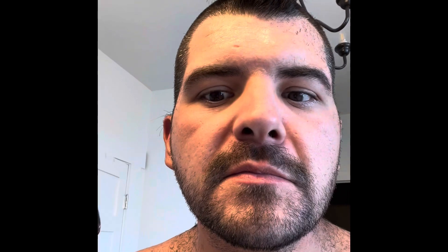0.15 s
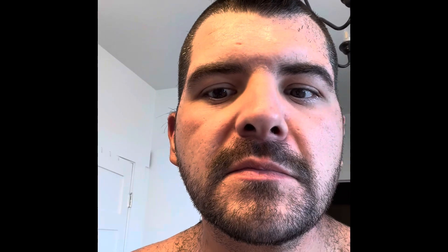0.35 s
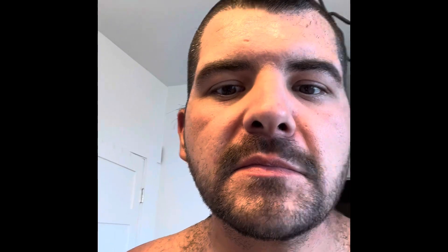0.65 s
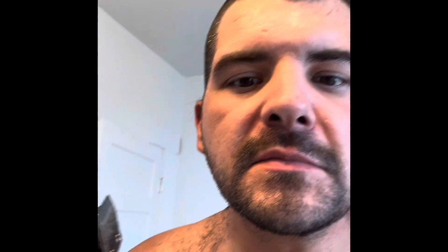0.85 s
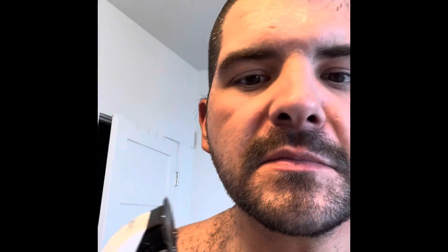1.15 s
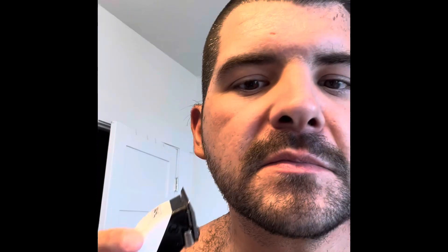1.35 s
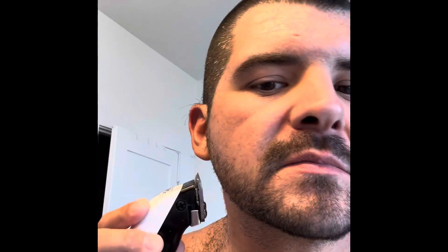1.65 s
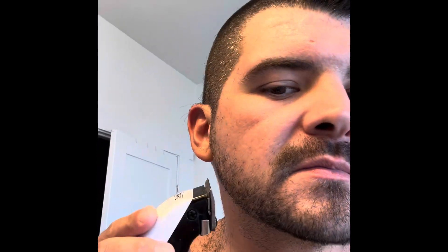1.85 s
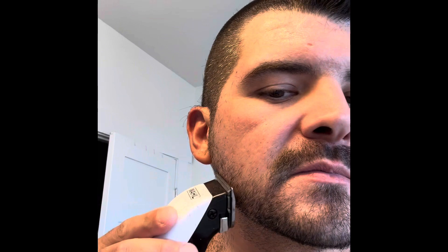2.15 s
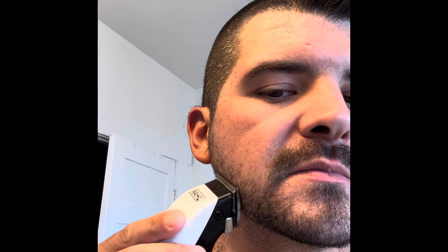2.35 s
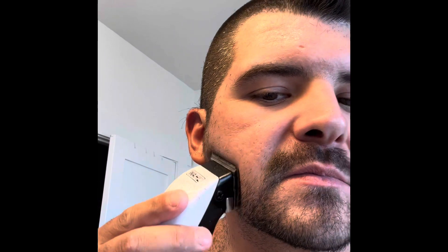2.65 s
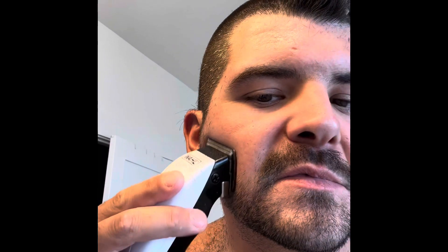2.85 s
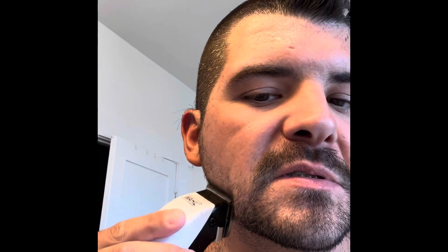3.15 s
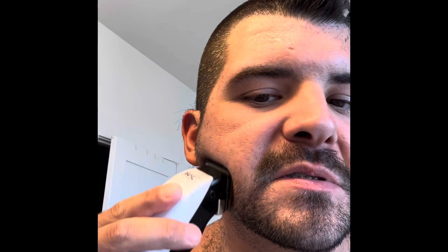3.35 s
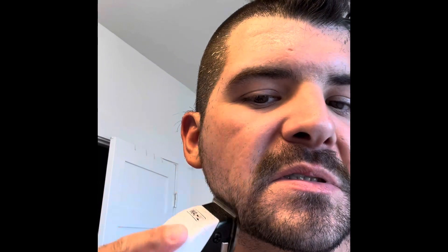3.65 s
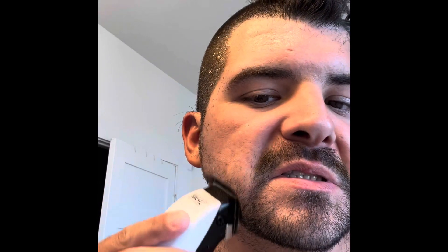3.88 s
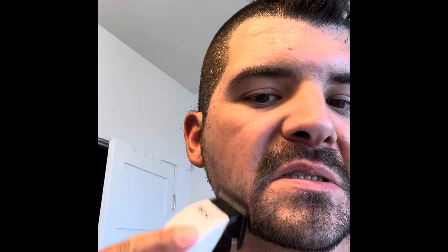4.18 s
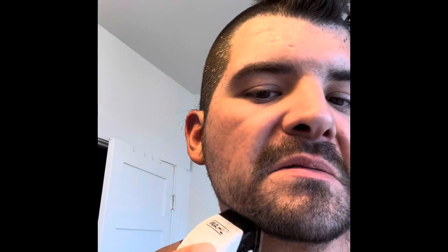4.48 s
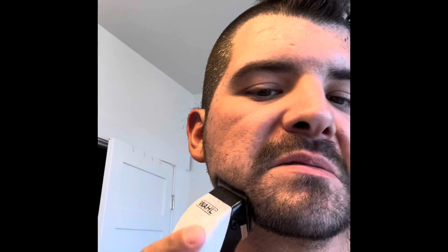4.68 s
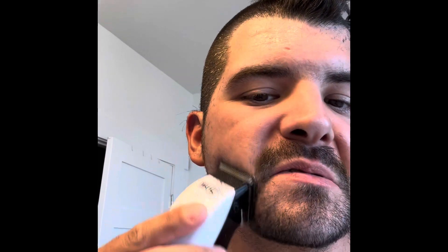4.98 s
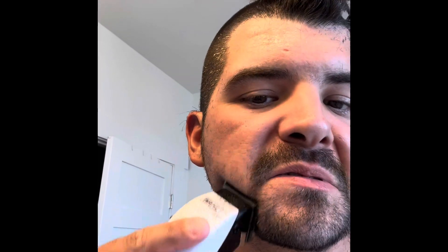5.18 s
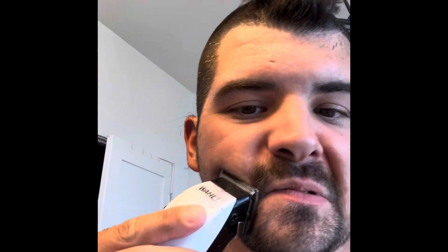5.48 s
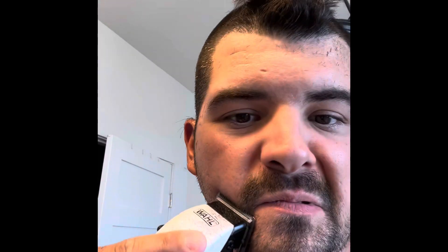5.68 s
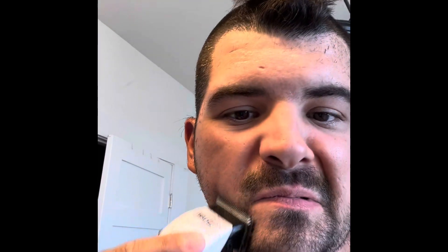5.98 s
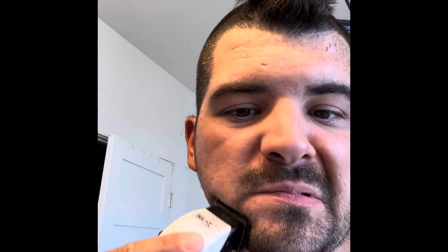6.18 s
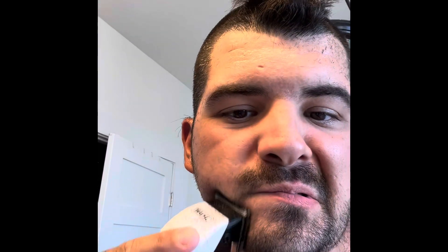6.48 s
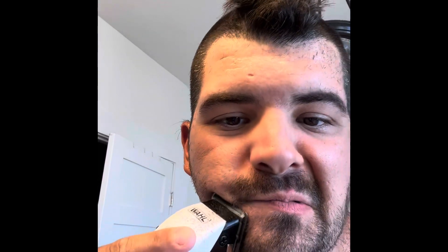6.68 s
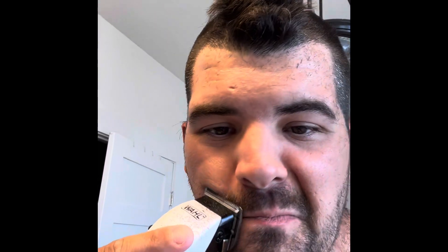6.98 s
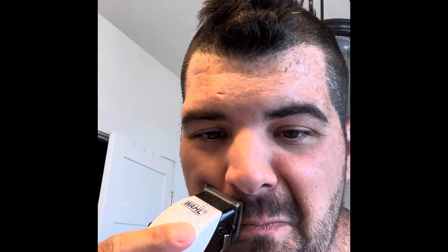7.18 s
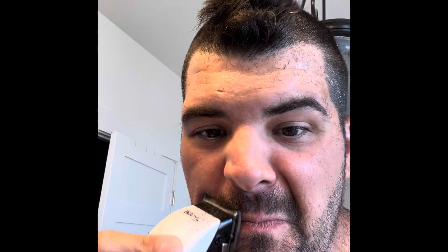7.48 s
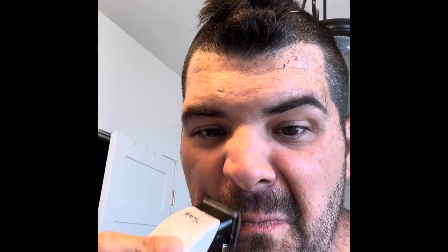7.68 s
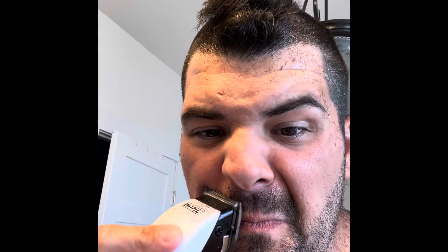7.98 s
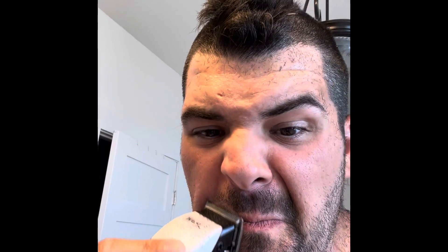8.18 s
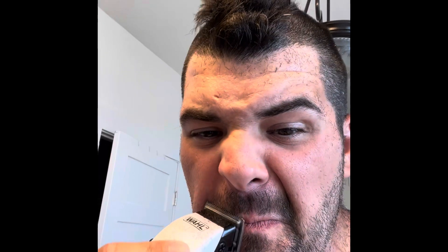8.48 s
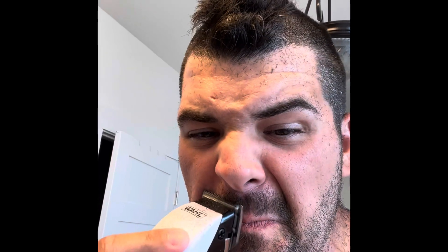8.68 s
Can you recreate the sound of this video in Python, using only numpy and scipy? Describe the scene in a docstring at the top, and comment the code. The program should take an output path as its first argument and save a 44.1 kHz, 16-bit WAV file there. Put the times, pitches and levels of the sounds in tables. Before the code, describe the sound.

A close stereo microphone in a quiet room catches hair clippers buzzing harshly at once, then abruptly quieter as the hand moves off, the tone shifting and sweeping. From about two and a half seconds the blade works on a beard: repeated brief strokes, each with a bristly rasp and a boomier buzz, with snapping hairs between. Later strokes near the lip are louder, with a sharp double bump and bright chirring of the comb.

```python
"""Hair clippers through a beard

Mains-driven clippers buzz right beside two microphone ports, swing away and are pushed through a beard in short strokes.
The armature hums near 120 Hz; the blade knocks hard one way and lightly on the way back, ringing case and steel.
Filtered noise and random plucks make the rasp of stubble, with snapping hairs, bumps and twangs of the comb.
A soft hollow rush slides down in pitch; a short room tail and still air lie behind it all."""
import sys
import numpy as np
from scipy import signal
from scipy.fft import rfft, irfft
from scipy.io import wavfile
from scipy.ndimage import uniform_filter1d, map_coordinates

SR = 44100
rng = np.random.default_rng(int(sys.argv[2]) if len(sys.argv) > 2 else 0)


def file_out(sig):
    """Save sig as 16-bit WAV at sys.argv[1]."""
    # one column per channel
    cols = np.atleast_2d(sig).T
    # limit, then scale
    lim = np.clip(cols, -1, 1)
    pcm = np.round(lim * 32767).astype(np.int16)
    wavfile.write(sys.argv[1], SR, pcm)


N = 389844
TIME = np.arange(N) / SR
BINS = np.fft.rfftfreq(N, 1 / SR)
STROKE_HZ = 120.0  # mean stroke rate
# return stroke: its place in the cycle (cycles), its strength against the outward stroke (0-1)
BACK_AT, BACK_KNOCK = .62, .45
STEEL_ABOVE_HZ = 2500  # the case knocks below this, the blade rings above


def amp(db):
    """Decibels to gain."""
    return 10 ** (np.asarray(db) / 20)


def unit(x):
    """Scales to rms 1."""
    return x / np.sqrt(np.mean(abs(x) ** 2) + 1e-20)


def follow(rows, t):
    """Every column of a curve at the times t."""
    s, *columns = np.transpose(rows)
    return [np.interp(t, s, c) for c in columns]


def across(rows, hz):
    """Every column of a spectrum at the frequencies hz, read on a log frequency scale."""
    f, *columns = np.transpose(rows)
    return [np.interp(np.log(hz + 1e-3), np.log(f), c) for c in columns]


def tint(x, colour):
    """Gives x a spectral colour, at rms 1."""
    return unit(irfft(rfft(x) * amp(across(colour, BINS)[0]), N))


def drift(shape, size):
    """Smooth chance along the last axis, rms 1."""
    x = rng.standard_normal(shape)
    for _ in range(2):
        x = uniform_filter1d(x, size, mode="wrap")
    return unit(x)


def arch(t, start, length):
    """Rises from 0 to 1 and falls back."""
    return abs(np.sin(np.pi * np.clip((t - start) / length, 0, 1)))


def add(mix, s, sound):
    """Lays a sound into the mix at time s."""
    part = mix[..., round(s * SR):][..., :sound.shape[-1]]
    part += sound[..., :part.shape[-1]]


# When one way of holding gives way to the next; 0 beside the ports, 1 in the air, 2 on the skin:
# (time [s], hold [0-2])
HOLDS = [(.37, 0), (.55, 1), (2.3, 1), (2.5, 2)]


def holding(t):
    """Crossfade shares of the three ways of holding: beside the ports, in the air, on the skin."""
    hold, = follow(HOLDS, t)
    return [np.maximum(1 - abs(hold - i), 0) for i in range(3)]


# Colour of the still air, only its shape counts: (frequency [Hz], relative density [dB per Hz])
AIR_COLOUR = [(20, -16.5), (45, -9.5), (80, 3.5), (150, -4.5), (250, -13), (600, -9), (2000, -70),
              (6000, -13), (15000, -27)]


def still_air(level_db=-61.5):
    """Steady coloured noise, one independent stream for each of two signals."""
    return amp(level_db) * tint(rng.standard_normal((2, N)), AIR_COLOUR)


def room(x, t60=0.77, low_hz=1000, high_hz=3000):
    """A tail of dense reflections, strongest in the middle range and cut off after half a second."""
    t = np.arange(SR // 2) / SR
    band = signal.butter(2, [low_hz, high_hz], "bandpass", fs=SR, output="sos")
    after_gap = t > .004
    tail = signal.sosfilt(band, rng.standard_normal(len(t)) * amp(-60 * t / t60) * after_gap)
    return signal.fftconvolve(x, tail / np.linalg.norm(tail))[:N]


# Balance of side against mid across the band; around 9 kHz the mid all but vanishes and the side carries the
# sound: (frequency [Hz], side minus mid [dB])
PORT_SPREAD = [(120, -15.5), (360, -2.5), (600, 4.5), (1000, -16), (1400, -4.5), (2000, 0), (2750, 5.5),
               (4100, -4), (5200, 1), (6300, -2.5), (7500, 3), (9200, 56), (11400, -0.5), (13500, -34.5)]


def ports(direct, scattered, likeness):
    """Spreads sound over two ports: the direct part is shared, the scattered part differs freely."""
    ratio, c = amp(across(PORT_SPREAD, BINS)[0]), np.clip(likeness, 0, 1)
    front = rfft(direct)
    side_wave = ratio * (c * port_lag(BINS) * front + np.sqrt(1 - c ** 2) * rfft(scattered))
    mid, side = irfft(np.array([front, side_wave]) / np.hypot(1, ratio), N)
    return np.array([mid + side, mid - side])


def port_lag(hz, delay_s=.00016):
    """Quarter-turn of the side against the mid, its sign set by the delay between the ports."""
    return -1j * np.sign(np.sin(2 * np.pi * hz * delay_s))


# The soft hollow rush, sliding down in pitch, before the port spread:
# (time [s], level [dB], centre [Hz])
RUSH_PATH = [(1.15, -82, 480), (1.4, -59, 430), (1.55, -49.5, 395), (1.75, -58, 365), (1.93, -50, 345),
             (2.1, -60, 305), (2.3, -62, 275), (2.5, -80, 260)]


def rush(width_hz=60):
    """Noise in one resonance that sinks: two-pole filtered complex noise shifted up to the moving centre."""
    level_db, hz = follow(RUSH_PATH, TIME)
    r = np.exp(-np.pi * width_hz / SR)
    noise = rng.standard_normal(N) + 1j * rng.standard_normal(N)
    fuzz = signal.lfilter([1], [1, -2 * r, r * r], noise)
    carrier = np.exp(2j * np.pi * np.cumsum(hz) / SR)
    return amp(level_db) * unit((fuzz * carrier).real)


# The clipper bumps the face: (time [s], peak [dB], centre [Hz], noise decay t60 [s])
FACE_BUMPS = [(4.002, -39, 230, .025), (7.5455, -17.5, 1350, .012), (7.549, -21, 1450, .014)]


def bumps():
    """Short dead knocks of the case against the face: decaying noise in a two-octave band."""
    out, t = np.zeros(N), np.arange(4096) / SR
    for s, peak_db, hz, t60 in FACE_BUMPS:
        band = signal.butter(2, [hz / 2, hz * 2], "bandpass", fs=SR, output="sos")
        knock = signal.sosfilt(band, rng.standard_normal(len(t)) * amp(-60 * t / t60))
        add(out, s, amp(peak_db) * knock / abs(knock).max())
    return out


# Pitch at which the comb rings; it ends higher as the grip shifts toward the lip:
# (time [s], frequency [Hz])
COMB_PITCH = [(2.4, 3900), (5.2, 3740), (6.4, 3760), (6.9, 4040), (8.84, 4170)]
# A tooth of the comb catches and chirrs: (time [s], peak [dB], length of the scrape [s])
TOOTH_TWANGS = [(2.359, -35, .014), (2.449, -36, .018), (3.095, -35, .025), (7.564, -24, .017),
                (8.293, -23, .009), (8.452, -32, .035), (8.601, -29, .01)]


def twangs(width_hz=520):
    """A caught tooth scrapes briefly: arched noise in a narrow band at the comb's pitch."""
    out, t = np.zeros(N), np.arange(4096) / SR
    for s, peak_db, length in TOOTH_TWANGS:
        edges = follow(COMB_PITCH, s)[0] + np.array([-.5, .5]) * width_hz
        band = signal.butter(2, edges, "bandpass", fs=SR, output="sos")
        chirr = signal.sosfilt(band, rng.standard_normal(len(t)) * arch(t, 0, length))
        add(out, s, amp(peak_db) * chirr / abs(chirr).max())
    return out


def comb_ring(x, width_hz=260, ring_db=1.0):
    """The toothed comb rings in a narrow bright band while it is on the skin."""
    turn = np.exp(2j * np.pi * np.cumsum(follow(COMB_PITCH, TIME)[0]) / SR)
    r = np.exp(-np.pi * width_hz / SR)
    # shift the comb's pitch down to zero, low-pass, shift back up
    ring = (turn * signal.lfilter([1 - r], [1, -r], x / turn)).real
    return amp(ring_db) * holding(TIME)[2] * ring


# The thickest hairs snapping: (time [s], peak [dB])
HAIR_SNAPS = [(3.256, -33), (3.461, -35), (4.995, -29), (5.061, -32), (5.408, -24), (5.461, -29),
              (6.127, -26.5), (6.244, -28), (6.547, -25), (6.557, -23), (6.709, -28), (6.966, -44),
              (6.975, -32), (7.158, -40), (7.204, -31), (8.636, -34), (8.795, -28), (8.804, -28)]
# Modes of the blade, struck by a snap or plucked by bristles:
# (frequency [Hz], relative level [dB], decay t60 [s])
BLADE_MODES = [(2283, -3.5, 0.029), (2774, -4.5, 0.063), (3790, 2, 0.014), (4092, 1, 0.032),
               (4464, -2, 0.039), (5870, -3.5, 0.022), (9360, -21, 0.006), (13050, -6.5, 0.005)]


def snaps(tick=0.53, tick_s=0.00098, tick_hz=4500):
    """A thick hair gives way with a bright noise tick and rings the blade's decaying modes."""
    out, t = np.zeros(N), np.arange(2048) / SR
    bright = signal.butter(2, tick_hz, "highpass", fs=SR, output="sos")
    for s, peak_db in HAIR_SNAPS:
        ring = np.zeros(len(t))
        for hz, db, t60 in BLADE_MODES:
            strike = rng.uniform(0.52, 1)
            ring += strike * amp(db - 60 * t / t60) * np.sin(2 * np.pi * hz * t)
        ring += tick * signal.sosfilt(bright, rng.standard_normal(len(t)) * np.exp(-t / tick_s))
        add(out, s, amp(peak_db) * ring / abs(ring).max())
    return out


def armature(sway=0.0025, jitter=.0009):
    """Strokes counted since the start: mains rate, swaying with the hand, each knock a hair early or late."""
    t = np.arange(1100) / STROKE_HZ
    slip = sway * drift(len(t), size=40) + jitter * rng.standard_normal(len(t))  # in cycles
    return STROKE_HZ * TIME + np.interp(TIME, t, slip)


# Hum of the armature before its trim, growing later as the clipper works nearer; on the skin
# the buzz follows it too: (time [s], level [dB])
HUM_LEVEL = [(0, -33), (0.45, -41.5), (1.5, -38), (3.05, -40.5), (5.2, -37.5), (7.7, -33), (8.84, -33)]
# Partials of the hum: (multiple of the stroke rate, relative level [dB], extra beside the ports [dB])
HUM_PARTIALS = [(1, 0, 0), (2, -21, 2), (3, -17, 9)]
# A tone just above the hum that makes it waver: (time [s], level [dB])
WAVER_LEVEL = [(0, -67), (4.3, -67.5), (4.44, -53), (4.62, -65), (8.5, -63), (8.7, -42), (8.84, -69)]


def hum(turns, trim_db=-2.5, waver_hz=144.7, waver_depth=1.0, air_pan_db=2.3, air_lead_rad=0.9):
    """The swinging armature shakes the body: low sines, louder and earlier at the left port in the air."""
    near, in_air, _ = holding(TIME)
    toward = np.array([[.5], [-.5]]) * in_air
    tone = np.zeros((2, N))
    for k, db, near_db in HUM_PARTIALS:
        phase = 2 * np.pi * (k * turns + rng.random()) + toward * air_lead_rad
        tone += amp(db + near * near_db) * np.sin(phase)
    waver_phase = 2 * np.pi * (waver_hz * TIME + waver_depth * drift(N, size=6000))
    waver = amp(follow(WAVER_LEVEL, TIME)[0]) * np.sin(waver_phase)
    level = amp(follow(HUM_LEVEL, TIME)[0] + trim_db + toward * air_pan_db)
    return np.sqrt(2) * (level * tone + waver)


# The clipper swings from beside the ports round to the cheek; base levels before make-up and trim:
# (time [s], buzz [dB], rasp of the free teeth [dB])
SWING_LEVELS = [(0, -17, -32.5), (0.22, -20, -35), (0.335, -21, -32.5), (.37, -31, -29.5),
                (0.41, -41.5, -40.5), (0.62, -47, -52.5), (1.05, -42.2, -55), (1.35, -41, -49),
                (1.53, -44.5, -49), (1.65, -46.5, -57), (2.25, -46.5, -59.5)]
# Rasp of the teeth gliding over the skin between pushes, growing as they come nearer:
# (time [s], level [dB])
GLIDE_LEVEL = [(2.9, -58.5), (3.6, -51.5), (5.2, -48), (8.84, -44.5)]
# Pushes through the beard, laid over the glide: (start [s], length [s], added gain at the middle [dB])
BEARD_PUSHES = [(2.303, 0.53, -48), (3.051, 0.13, -49), (3.184, 0.27, -47), (3.602, 0.14, -52.5),
                (3.792, 0.26, -43.5), (4.19, 0.29, -47), (4.493, 0.26, -44), (4.659, 0.33, -45.5),
                (4.935, 0.26, -54), (5.24, 0.37, -48.5), (5.746, 0.21, -38), (6.235, 0.24, -44.5),
                (6.45, 0.44, -51), (6.88, 0.23, -39.5), (7.115, 0.13, -41.5), (7.265, 0.089, -49),
                (7.46, 0.2, -36), (7.854, 0.18, -41.5), (8.233, 0.16, -38.5), (8.56, 0.22, -40.5)]


def cutting_gain(free_trim_db=-0.5, push_shape=0.95):
    """Strength of the rasp: free teeth in the air; on the skin a glide plus one arch for each push."""
    on_skin = holding(TIME)[2]
    free = amp(follow(SWING_LEVELS, TIME)[1] + free_trim_db)
    glide = amp(follow(GLIDE_LEVEL, TIME)[0])
    gain = (1 - on_skin) * free + on_skin * glide
    for start, length, db in BEARD_PUSHES:
        push = arch(np.arange(0, length, 1 / SR), 0, length) ** push_shape  # higher = slower entry and exit
        add(gain, start, amp(db) * push)
    return gain


# When the outward stroke lands, one row each for beside the ports, in the air, on the skin:
# (knock of the case [cycles], ring of the blade [cycles])
STROKE_LANDS = [(.43, .62), (.77, .69), (.84, .67)]


def landing(k, t):
    """Phase of the partials k at the times t: low knock and bright ring land at different points."""
    at = np.where(k[:, None] * STROKE_HZ < STEEL_ABOVE_HZ, *np.transpose(STROKE_LANDS))
    return np.exp(-2j * np.pi * k[:, None] * at) @ np.sqrt(holding(t))


def bite(turns, length=.15, between=.36):
    """The teeth close twice a stroke, hard out and lightly back, over steady rubbing; length in cycles."""
    def close(at):
        phase = turns - STROKE_LANDS[-1][-1] - at
        return np.exp(-(np.sin(np.pi * phase) / (np.pi * length)) ** 2)
    return between + close(0) + BACK_KNOCK * close(BACK_AT)


def pings(turns, per_s=170, spread_db=3.5, level_db=-7.0):
    """Single bristles pluck the modes of the blade while it is on the skin, mostly as the teeth bite."""
    t, out = np.arange(2048) / SR, np.zeros(N)
    chance = unit(bite(turns)) * per_s / SR  # per mode and sample
    for hz, db, t60 in BLADE_MODES:
        sizes = amp(spread_db * np.minimum(rng.exponential(1, N), 3))
        plucks = (rng.random(N) < chance) * sizes
        mode = amp(db - 60 * t / t60) * np.sin(2 * np.pi * hz * t)
        out += signal.oaconvolve(plucks, mode)[:N]
    return amp(level_db) * cutting_gain() * holding(TIME)[2] * unit(out)


# Colour of the rasp before the comb rings, only its shape counts:
# (frequency [Hz], relative density [dB per Hz])
RASP_TINT = [(100, -19), (300, -16), (540, -1), (780, -11.5), (1140, -9.5), (1620, -5), (2600, -1.5),
             (3420, -1.5), (4020, -4), (4980, -9.5), (6660, -10), (9660, -14), (11800, -27.5), (15600, -21)]


def rasp(turns, hairs_per_s=1500, hair_spread_db=2.4, crackle=1.1, tuft_db=1.8):
    """The teeth rub and shear hairs: noise and random clicks pulsed by the bite, each tuft coloured anew."""
    sizes = amp(hair_spread_db * np.minimum(rng.exponential(1, N), 4.5)) * rng.choice([-1, 1], N)
    hairs = unit(sizes * (rng.random(N) < hairs_per_s / SR))
    rubbing = rng.standard_normal(N)
    z = signal.stft(bite(turns) * (rubbing + crackle * hairs), nperseg=256)[2]
    tufts = unit(uniform_filter1d(drift(z.shape, size=12), size=4, axis=0))
    teeth = signal.istft(z * amp(tuft_db * tufts), nperseg=256)[1][:N]
    teeth = tint(teeth, RASP_TINT)
    return cutting_gain() * unit(teeth + comb_ring(teeth))


# The shoulder throws the buzz back as the clipper swings past:
# (time [s], echo delay [ms], echo strength [0-1])
SHOULDER_ECHO = [(.3, 0.36, 0.02), (.45, 0.7, 1), (.7, 0.77, 0.06), (1.05, 0.81, 0.34), (1.3, 0.46, 0.2),
                 (1.5, 0.65, 0.14), (1.7, 0.52, 0.36), (2.2, 0.82, 0.17), (2.5, 0.82, 0.31)]


def shoulder(hz, t):
    """One echo of moving delay combs the buzz, so its bands sweep up and down."""
    delay_ms, strength = follow(SHOULDER_ECHO, t)
    lag = np.exp(-2j * np.pi * np.outer(hz, delay_ms) / 1000)
    return (1 + strength * lag) / np.hypot(1, strength)


# Make-up of the buzz, one row each for beside the ports, in the air, on the skin; relative to the
# swing's buzz or, on the skin, the hum: (boom of the case [dB], knock [dB], ring of the blade [dB])
BUZZ_BALANCES = [(-13, -14.5, -16), (-14.5, -17, -15.5), (-16.5, -17, -16)]
# Hair loads the blade, so the case booms more and the steel rings less:
# (boom [dB], knock [dB], ring [dB])
HAIR_LOAD = (2.5, -0.5, -4)
# The case is pressed harder (+) or more lightly (-) against the jaw:
# (start [s], length [s], more boom [dB], more knock [dB])
JAW_PRESSES = [(2.702, 1.0, -3.5, 0), (4.257, 0.47, 5.5, -1), (7.16, 0.32, 9.5, 0.5), (8.185, 0.93, 3, 0)]


def buzz_bands(t):
    """Boom, knock and ring in dB: they follow nearness, the load of hair and the pressure on the jaw."""
    shares = holding(t)
    level_db = (1 - shares[2]) * follow(SWING_LEVELS, t)[0] + shares[2] * follow(HUM_LEVEL, t)[0]
    load = np.minimum(sum(arch(t, start, length) for start, length, _ in BEARD_PUSHES), 1)
    bands = level_db + np.transpose(BUZZ_BALANCES) @ shares + np.outer(HAIR_LOAD, load)
    for start, length, *more_db in JAW_PRESSES:
        bands[:2] += np.outer(more_db, arch(t, start, length))
    return bands


# Tone of the case, one row per multiple of the stroke rate from the fourth up, relative levels:
# (beside the ports [dB], in the air [dB], on the skin [dB],
#  side minus mid beside the ports [dB], side minus mid further off [dB])
CASE_TONE = [(-5.5, 4, 0.5, 1, -1.5), (1, 3, -0.5, 4.5, -26), (-3, 4.5, -5.5, 10.5, -5.5),
             (-2.5, 0, -0.5, 4, -9.5), (-3.4, -1.5, 1.4, -6, -12.5), (0.5, 3.5, 2, -17, -28),
             (-3, 3, -6.5, -9, -11), (1, -0.5, -9.5, -18, -11.5), (-1, 1.5, -5.5, -7, -1),
             (-3.5, -7, -2.5, -12, -4.5), (2, -1, -0.5, -6, -4), (-8, -3.5, -12, -9, -5.5),
             (-2, -9, -17, -24, 1), (-1, -3, -7, 3, 5.5), (-4.5, 2.5, -2, -5, -1.5),
             (-5.5, -6, -5.5, -2, 5), (1, 2, -15.5, -12, 0.5), (-0.5, 0.5, -2.5, 4, 7),
             (4.5, 5, -8, 3.5, 4), (-5, 1.5, -3, -2, 8), (5.5, 7, -8, 13.5, 4.5), (-8.5, -2, -36, -3, 5),
             (4.5, -3.5, -6, 8, 14), (-9, -3, -8, 5, -0.5), (-5, -4, -27, -2, 5),
             (-10, -2.5, -9.5, -18, -3), (-1, -2.5, -12, -10, -6.5), (0.5, -0.5, -10, -2.5, 0.5),
             (-7, -2, -8, -6, -5), (-1.5, -0.5, -19, -18, 0)]
# The same tone further up, where the steel blade rings, relative levels:
# (frequency [Hz], beside the ports [dB], in the air [dB], on the skin [dB])
STEEL_TONE = [(3960, -9, -9, -9.5), (4340, -3.5, -8, -21), (4440, -3.5, -6, -10.5), (4560, -21, -15, -32.5),
              (4680, -3, -11.5, -13), (4900, -18, -20, -19), (5170, -0.5, -11, -20), (5750, -15, -23, -14),
              (5350, -4, 1.5, -21.5), (5550, -13, -8, -13), (6270, -0.5, -12, -23.5),
              (6720, -11.5, -16.5, -15.5), (6900, -6, -17, -12), (7070, -11, -14, -26),
              (7150, -17.5, -27, -26), (7880, -4.5, -16, -13), (9120, -31, -26, -26),
              (10390, -3.5, -35, -26), (11600, -31, -59, -33.5), (13200, -23, -56, -28),
              (15360, -30, -32, -37)]
# A change of grip, or the hollow between case and body, makes a resonance sing (+) or damps it (-):
# (start [s], end [s], centre [Hz], Gaussian spread [Hz], mean change at the middle [dB])
GRIP_SWELLS = [(0.26, .39, 2520, 300, 8), (0.214, 0.314, 2160, 50, 5), (.68, .98, 2280, 50, 7),
               (.7, 1.607, 830, 168, 6.5), (.72, 1.12, 1200, 50, 1), (1.13, 1.546, 3170, 300, 10.5),
               (1.3, 1.62, 1560, 50, 16), (1.59, 1.884, 2400, 50, 16), (2.106, 2.605, 2880, 50, 13.5),
               (2.2, 5.4, 3900, 200, 7.5), (2.6, 4.447, 2160, 50.12, 3), (2.88, 3.259, 1100, 70, -8),
               (3.1, 3.85, 2160, 50, 3.5), (4.23, 4.64, 480, 50.3, 7), (4.246, 4.72, 2880, 50, 13),
               (4.33, 4.385, 2880, 50, 14), (4.316, 4.624, 1100, 100, 5), (4.78, 5.084, 1080, 50, -12),
               (5.16, 5.455, 2160, 47.5, -14), (5.5, 5.72, 2280, 50, 8), (5.92, 6.266, 2280, 50.56, 12.5),
               (6, 6.223, 3720, 50, 13), (6.553, 7.158, 2260, 70, 14), (6.5, 8.846, 1020, 89.5, 1),
               (7.15, 7.462, 1400, 230, 9.5), (7.293, 9, 2560, 128.2, 4), (7.443, 8.84, 2020, 70.5, 11.5),
               (7.73, 7.85, 2160, 50, -14), (7.598, 8.295, 1100, 69.6, 0.5), (8.304, 9, 2140, 139, 3)]


def partial_levels(k, t, boom_hz=650, knock_hz=900, knock_top_hz=1700, ring_hz=2100, flutter=.3):
    """Level in dB of the partials k at the times t, set by hold, pressure and fluttering resonances."""
    hz = k * STROKE_HZ
    tones = np.array(across(STEEL_TONE, hz))
    tones[:, :len(CASE_TONE)] = np.transpose(CASE_TONE)[:len(tones)]
    level_db = tones.T @ holding(t)
    boom_db, knock_db, ring_db = buzz_bands(t)
    low = np.interp(hz, [boom_hz, knock_hz], [1, 0])
    high = np.interp(hz, [knock_top_hz, ring_hz], [0, 1])
    level_db += np.outer(low, boom_db) + np.outer(1 - low - high, knock_db) + np.outer(high, ring_db)
    for start, end, sung_hz, width_hz, db in GRIP_SWELLS:
        resonance = np.exp(-((hz - sung_hz) / width_hz) ** 2 / 2)
        swell = np.sqrt(arch(t, start, end - start)) * (1 + flutter * drift(len(t), size=5))
        level_db += db * np.outer(resonance, swell)
    return level_db


# The skin keeps gripping and freeing the blade, so its main ring breaks up:
# (centre [Hz], Gaussian spread [Hz], rms depth [dB])
SKIN_CHATTER = (2300, 350, 3.0)


def unrest(hz, t, wander_db=2.2):
    """Chance in the partials' levels in dB: slow wander turning in the air, quick chatter on the skin."""
    _, in_air, on_skin = holding(t)
    centre_hz, width_hz, depth_db = SKIN_CHATTER
    shape = len(hz), len(t)
    wander_share = np.outer(np.minimum(hz / STEEL_ABOVE_HZ, 1), in_air)
    chatter_share = np.outer(np.exp(-((hz - centre_hz) / width_hz) ** 2 / 2), on_skin)
    return wander_db * wander_share * drift(shape, size=16) + depth_db * chatter_share * drift(shape, size=3)


def stroke_knock(k, size, ring_cycles=.1, clatter=0.24, clatter_above_hz=7500):
    """Partials of one stroke: a decaying noise knock, its return, and tooth clatter taking over up high."""
    cycle = np.arange(size) / size
    ring = unit(rfft(rng.standard_normal(size) * np.exp(-cycle / ring_cycles))[k])
    teeth = unit(rfft(rng.standard_normal(size))[k])
    knocks = ring * (1 + BACK_KNOCK * np.exp(-2j * np.pi * k * BACK_AT))
    return knocks + clatter * (1 + (k * STROKE_HZ / clatter_above_hz) ** 4) * teeth


# Quick sweeps of the hand, which stir the reflections and make the upper partials waver:
# (start [s], length [s], depth [ratio])
HAND_SWEEPS = [(0.21, 0.5, 1), (0.2, .17, .6), (1.0, 0.62, 0.5)]


def buzz(turns, near_calm=0.65, steady_below_hz=1400, trim_db=0.0, size=2048, fade_depth=.37):
    """Blade knocks ring the case; reflections swell and fade each partial. Gives mid and side."""
    t, k = np.arange(0, N / SR + .02, 1 / 100), np.arange(4, 133)
    hz, shape = k * STROKE_HZ, (len(k), len(t))
    knock = stroke_knock(k, size)
    # dragging over skin shakes the blade; short waves feel every movement most
    flutter = np.interp(follow(HOLDS, t)[0], [0, 1, 2], [.13, .12, .24])
    near, reach = holding(t)[0], np.minimum(hz / steady_below_hz, 1)[:, None]
    stir = sum(depth * arch(t, start, length) for start, length, depth in HAND_SWEEPS)
    depths = fade_depth * (1 - near_calm * near), flutter, stir
    steadiness = np.sqrt(1 + 2 * reach ** 2 * sum(d ** 2 for d in depths))
    spread_db = across(PORT_SPREAD, hz)[0][:, None] + np.zeros(shape)
    spread_db[:len(CASE_TONE)] = np.array(CASE_TONE)[:, -2:] @ [near, 1 - near]
    level = amp(partial_levels(k, t) + unrest(hz, t) + trim_db)
    level = level * shoulder(hz, t) * landing(k, t) / np.hypot(1, amp(spread_db))
    out = []
    for share in 1, amp(spread_db) * port_lag(hz)[:, None]:
        paths = np.zeros(shape, complex)
        for depth, n in zip(depths, (36, 4, 6)):
            paths += depth * (drift(shape, size=n) + 1j * drift(shape, size=n))
        # the knock gives only its phases here
        partials = share * level * ((knock / abs(knock))[:, None] + reach * paths) / steadiness
        # one cycle of the wave for each moment, read at the armature's pace
        waves = irfft(np.pad(partials, ((k[0], 0), (0, 0))), size, axis=0) * size / np.sqrt(2)
        out.append(map_coordinates(waves, [turns % 1 * size, TIME / t[1]], order=1, mode="grid-wrap"))
    return np.array(out)


def scene(direct_wet_db=-11, scattered_wet_db=-9, buzz_wet_db=-19):
    """Hum, buzz and cutting noise over the still room."""
    turns = armature()
    mid, side = buzz(turns)
    air = still_air()
    cutting, knocks = rasp(turns) + pings(turns), bumps() + twangs()
    direct = cutting + rush() + air[0]
    direct += amp(direct_wet_db) * room(cutting + knocks) + amp(buzz_wet_db) * room(mid)
    scattered = rasp(turns) + pings(turns) + air[1]
    scattered += amp(scattered_wet_db) * room(cutting) + amp(buzz_wet_db) * room(side)
    buzzing = np.array([mid + side, mid - side])
    return buzzing + ports(direct, scattered, likeness=0.35) + snaps() + knocks + hum(turns)


def record(dry, edge_hz=15850):
    """A steep low-pass limits the top of the band."""
    lowpass = signal.firwin(801, edge_hz, window=("kaiser", 9), fs=SR)
    return signal.oaconvolve(dry, lowpass[None], "same")


dry = scene()
out = record(dry)
file_out(out)
```